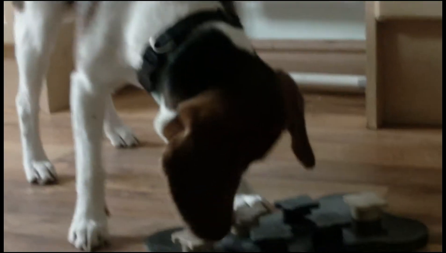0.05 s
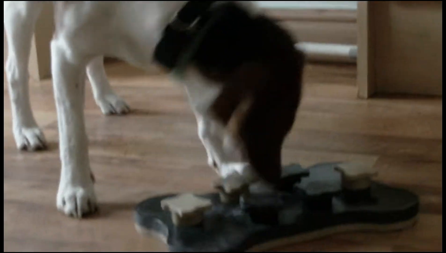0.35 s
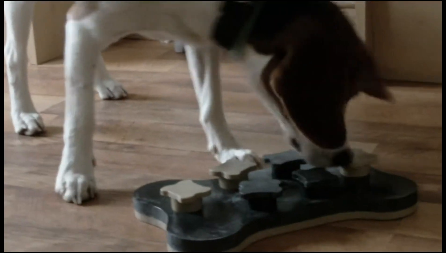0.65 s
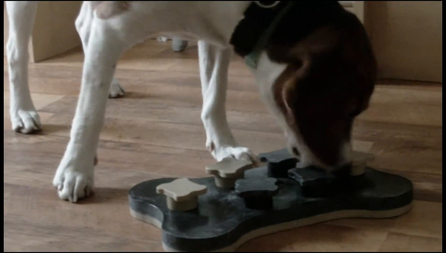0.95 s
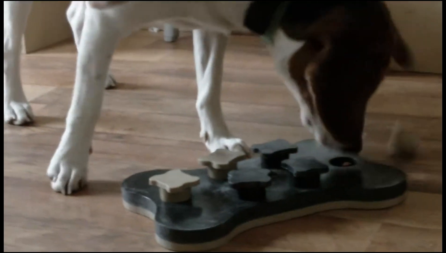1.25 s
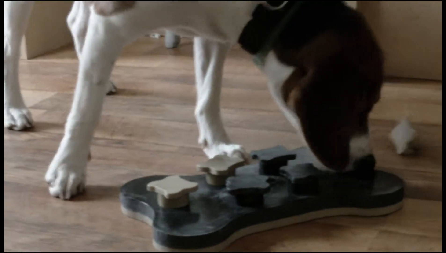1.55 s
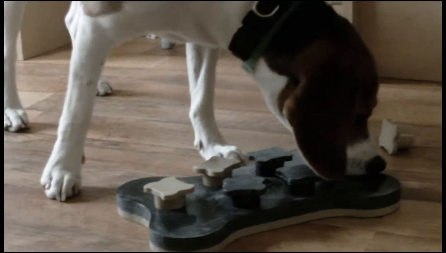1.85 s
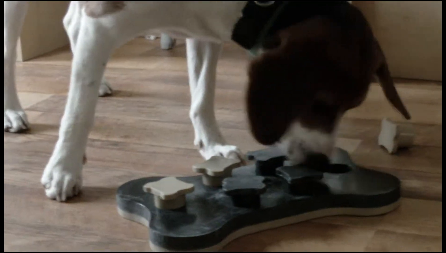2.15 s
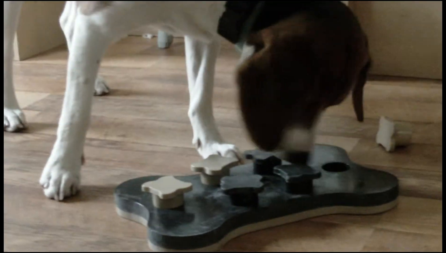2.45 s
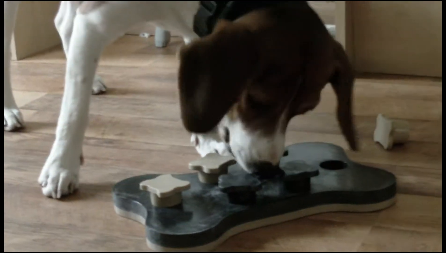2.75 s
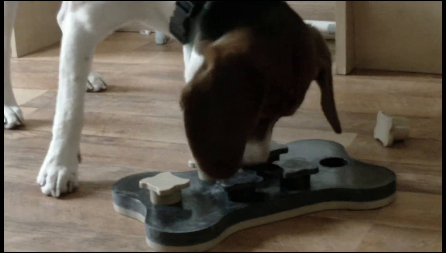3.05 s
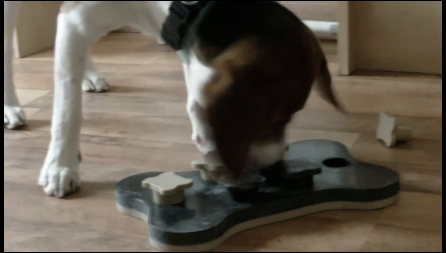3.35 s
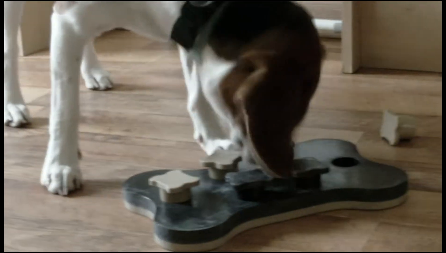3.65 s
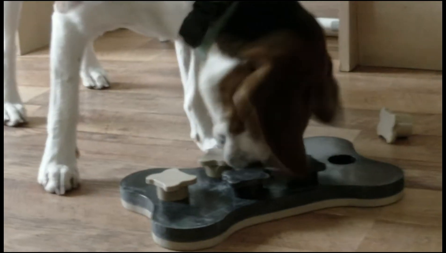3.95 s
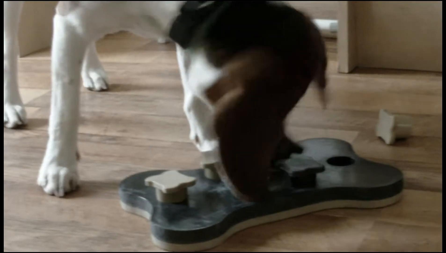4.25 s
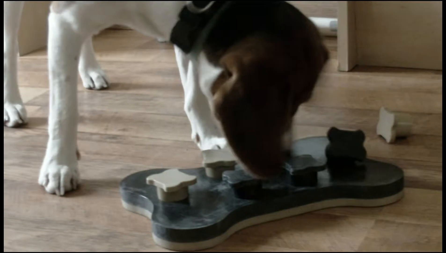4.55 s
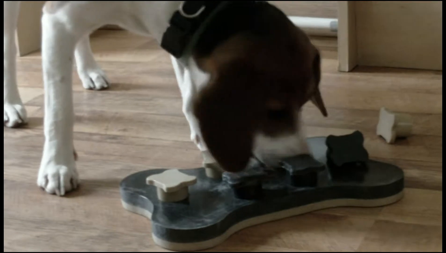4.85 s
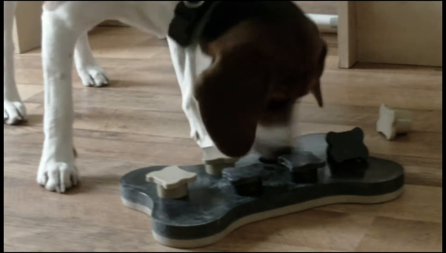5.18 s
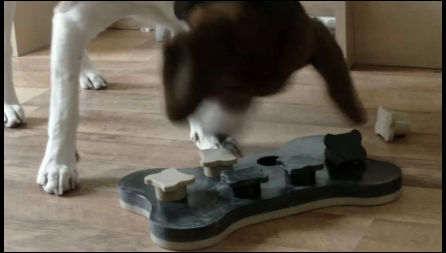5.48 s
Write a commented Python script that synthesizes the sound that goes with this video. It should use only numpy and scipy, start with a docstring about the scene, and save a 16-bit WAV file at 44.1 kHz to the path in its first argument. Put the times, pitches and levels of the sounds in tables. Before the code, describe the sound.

In a reverberant room with a faint hum, plastic covers tick and scrape softly as a dog pushes at a puzzle board. One piece tumbles onto the hard floor with several loud, quickly bouncing clacks. After a quieter stretch of small taps, slides and brief sniffs, a second piece rattles over the hollow board and settles, with a light collar jingle. The sound reaches the microphone louder on the right.

```python
"""Soft bumps and light clicks come first: a dog noses the plastic covers of a treat puzzle on laminate.
One cover tumbles onto the floor in ever shorter bounces; later another clatters across the hollow
board and rocks to rest. Each impact is a brief force filtered by the resonances of the struck body.
Between them come stick-slip scrapes and squeaks, sniffs and the tinkle of a collar ring,
in a bare, reverberant room with a faint machine hum."""
import sys
import numpy as np
from scipy import signal
from scipy.fft import rfft, irfft
from scipy.io import wavfile
from scipy.ndimage import uniform_filter1d

SR = 44100
rng = np.random.default_rng(int(sys.argv[2]) if len(sys.argv) > 2 else 0)


def unload_audio(sound):
    """Save the sound as a 16-bit wav file, at the path given as the first command line argument."""
    columns = np.transpose(np.atleast_2d(sound))
    # keep every value between -1 and 1, then stretch to whole-number steps
    steps = np.round(np.clip(columns, -1, 1) * 32767)
    wavfile.write(sys.argv[1], SR, steps.astype(np.int16))


N = 252252


# spectrum of a cover striking the laminate: (frequency [Hz], level [dB])
FLOOR_SPECTRUM = [(60, -58), (150, -22), (290, -14.5), (390, -4), (560, -1), (800, -7), (1100, -13.5),
                  (1400, -17), (1800, -23.5), (3100, -18), (4500, -31.5), (7000, -33), (10000, -42),
                  (16000, -58)]
# modes of the floorboards: (frequency [Hz], level [dB], 60 dB decay time [s])
FLOORBOARD_MODES = [(388, -3, .38), (440, -2, .42), (525, 0, .5), (573, -4, .45), (667, -4, .42),
                    (728, -9, .42), (804, -9, .4), (908, -13, .4), (1000, -15, .4), (1089, -16, .4),
                    (1299, -14, .35), (1410, -16, .35)]
def floor_knocks(gain_db=13, ring_db=-37, plastic_share=0.42):
    """Impact excitation: each blow gives a deep clack, then the floor's modes decay exponentially."""
    hits = landings() + rebounds() + bumps()
    body_db = read(FLOOR_SPECTRUM, bins()) + plastic_share * plastic_resonances()
    tracks = amp(gain_db) * impacts(hits, body_db, chatter_s=0.003, snap=0.41)
    t = np.arange(SR) / SR
    modes = sum(amp(db - 60 * t / t60) * np.sin(2 * np.pi * hz * t) for hz, db, t60 in FLOORBOARD_MODES)
    ringing = np.zeros(N)
    for s, db, *_ in hits:
        add(ringing, s, amp(db + gain_db + ring_db) * modes)
    return room(tracks, wet_db=-0.5, aim_db=np.transpose(hits)[2]) + ringing


# a loose cover falls on the floor: (time [s], relative level [dB], edge [dB],
# favoured ring [Hz], first flight [s], loss per bounce [dB])
COVER_DROPS = [(1.1878, -2, 0, 3270, .036, 0.5), (1.319, -9, -4, 560, 0.01, 11),
               (1.6428, -6.5, -0.5, 620, .024, 11)]
def landings(aim_db=3, thud_db=1, lift_db=4):
    """Momentum transfer: a falling cover first strikes the floor squarely."""
    return [(s, db, aim_db, thud_db, edge_db, hz, lift_db) for s, db, edge_db, hz, *_ in COVER_DROPS]


def rebounds(restitution=0.68, rebound_db=-5, aim_db=1, thud_db=-1, dull_db=-2, ring_hz=540, lift_db=4):
    """Inelastic collision: each bounce is shorter, weaker and duller than the last."""
    hits = []
    for s, db, edge_db, _, flight_s, loss_db in COVER_DROPS:
        for k in range(4):
            onset = s + flight_s * np.sum(restitution ** np.arange(k + 1))
            level = db + rebound_db - k * loss_db
            hits.append((onset, level, aim_db, thud_db, edge_db + (k + 1) * dull_db, ring_hz, lift_db))
    return hits


def board_knocks(gain_db=13):
    """Resonant filtering: the hollow board colours each blow of a cover into a plastic click."""
    hits = nudges() + fall_backs() + rocking()
    tracks = amp(gain_db) * impacts(hits, board_body(), chatter_s=0.0036, snap=0.15)
    return room(tracks, wet_db=-1, aim_db=np.transpose(hits)[2])


# broad spectrum of a cover striking the board: (frequency [Hz], level [dB])
BOARD_SPECTRUM = [(60, -30), (200, -1.5), (330, -5), (500, 0), (900, -5), (1100, -8.5), (1700, -15),
                  (2700, -5.5), (3500, -9.5), (4100, -27), (6500, -33.5), (8500, -36.5), (11000, -47),
                  (16000, -47)]
def board_body():
    """Frequency response of the board in dB: resonance peaks on a broad slope."""
    return read(BOARD_SPECTRUM, bins()) + plastic_resonances()


# resonances of the hollow plastic: (frequency [Hz], width [Hz], lift [dB])
PLASTIC_MODES = [(418, 98, 12.3), (1295, 125, 9.2), (1381, 203, 12.8), (1630, 30, 7.2), (2335, 100, 7.9),
                 (2920, 210, 2.8), (3340, 100, 5.2), (3866, 120, 1.6), (4500, 120, 2.7), (5400, 80, 8),
                 (7900, 350, 3)]
def plastic_resonances():
    """Normal modes: each lifts the spectrum, in dB, around its own frequency."""
    return sum(db * peak(hz, width) for hz, width, db in PLASTIC_MODES)


# the nose pushes a cover: (time [s], relative level [dB], thud [dB], edge [dB], favoured ring [Hz])
NOSE_KNOCKS = [(0.1854, -35.5, 9, 16, 2940), (0.2561, -31.5, 13, 15.5, 2350), (0.7253, -26.5, 5, 3, 467),
               (1.097, -29.5, 1.5, -6, 740), (1.140, -24.5, -5, -12, 1550), (1.928, -33, -1, -19, 1150),
               (2.61, -31, 6, -8, 3400), (3.0977, -34, -1, 10.5, 2430), (3.6235, -28, 8.5, 16, 3370),
               (3.739, -19, -3, 13, 3120), (4.1472, -30, -22, -9.5, 1260), (4.1807, -13, 1.5, 8, 3630),
               (4.3149, -11.5, -1, 7, 2280), (4.398, -12, -7.5, 2, 3460), (4.4660, -10.5, -6, 0, 3420),
               (4.5316, -19.5, 1.5, -19, 1820)]
def nudges(aim_db=3, lift_db=8):
    """Collision: the pushed covers strike the board, each spot favouring one ring."""
    return [(s, db, aim_db, thud_db, edge_db, hz, lift_db) for s, db, thud_db, edge_db, hz in NOSE_KNOCKS]


def fall_backs(above_db=-16, flight_s=0.037, softer_db=-5,
               aim_db=-2, thud_db=3, edge_db=-5, ring_hz=2300, lift_db=6):
    """Free fall: a cover lifted by a hard knock drops flat into its slot again."""
    return [(s + flight_s, db + softer_db, aim_db, thud_db, edge_db, ring_hz, lift_db)
            for s, db, *_ in NOSE_KNOCKS if db > above_db]


def rocking(start_s=4.5945, step_s=0.0313, db=-21.5, fade_db_per_s=-10, lift_db=7):
    """Damped oscillation: the last cover taps evenly, thin on its rim and full on its flat side."""
    # (aim [dB], thud [dB], edge [dB], favoured ring [Hz])
    rim, flat = (5, -10, -8, 3500), (0, 1, -20, 1400)
    return [(start_s + k * step_s, db + fade_db_per_s * k * step_s, *side, lift_db)
            for k, side in enumerate([rim, flat] * 3)]


# the dog shifts about on the floor: (time [s], relative level [dB])
DOG_BUMPS = [(0.095, -31.5), (0.23, -34.5), (1.901, -33), (2.027, -38)]
def bumps(aim_db=6, thud_db=7, edge_db=-7, ring_hz=255, lift_db=14):
    """Cushioned impact: a padded blow puts its energy into low frequencies."""
    return [(s, db, aim_db, thud_db, edge_db, ring_hz, lift_db) for s, db in DOG_BUMPS]


# covers slide in their slots: (time [s], length [s], level [dB], thud [dB], edge [dB])
COVER_SLIDES = [(0.702, 0.11, -48, 11, -4), (1.044, 0.1, -43.5, 3.5, -19), (2.592, 0.061, -46.5, -3, -33),
                (3.028, 0.16, -51.5, 11.5, -7), (3.358, 0.1157, -42.5, 11, 11),
                (4.135, 0.053, -36.5, 6, -16), (4.539, 0.284, -44, -6, -22)]
def scrapes(slips_per_s=1400, spread_db=2.5):
    """Stick-slip friction: many tiny, irregular jerks ring the board."""
    out = np.zeros(N)
    for s, length, db, thud_db, edge_db in COVER_SLIDES:
        n = round(length * SR)
        strength = rng.standard_normal(N) * amp(spread_db * rng.standard_normal(N))
        slipping = rng.random(N) < slips_per_s / SR
        force = unit_rms((strength * slipping)[:n]) * signal.windows.tukey(n, 0.7)
        board = ring(board_body() + touch(thud_db, edge_db))
        add(out, s, amp(db) * signal.fftconvolve(force, board))
    return room(out[None], wet_db=-3)


# short rubbing squeaks: (time [s], length [s], pitch [Hz], level [dB])
RUB_SQUEAKS = [(4.036, 0.0426, 518, -41), (5.134, 0.0394, 913, -53.5)]
def squeaks(waver=0.054):
    """Periodic stick-slip: the slips fall nearly into step and make a soft, wavering tone."""
    out = np.zeros(N)
    for s, length, hz, db in RUB_SQUEAKS:
        n = round(length * SR)
        drift = unit_rms(uniform_filter1d(rng.standard_normal(N), size=200))[:n]
        pitch = hz * (1 + waver * drift)
        tone = np.sin(2 * np.pi * np.cumsum(pitch) / SR)
        add(out, s, amp(db) * unit_rms(tone * signal.windows.cosine(n)))
    return room(out[None], wet_db=-26)


# the collar's metal ring is shaken: (time [s], length [s], pitch [Hz], relative level [dB])
COLLAR_SHAKES = [(1.074, .08, 7700, -48), (3.740, .02, 8000, -43), (4.179, .17, 7970, -44),
                 (4.465, .02, 8170, -34), (4.60, .08, 7750, -46)]
def tinkles(gain_db=12, step_s=0.062, width_hz=900, lift_db=36):
    """Damped resonance: each contact of the shaken ring excites one high, short-lived mode."""
    out = np.zeros(N)
    for s, length, hz, db in COLLAR_SHAKES:
        ping = ring(lift_db * peak(hz, width_hz))
        for delay in np.arange(0, length, step_s):
            force = contact(chatter_s=0.0062, snap=0.48)
            add(out, s + delay, amp(db + gain_db) * signal.fftconvolve(force, ping))
    return room(out[None], wet_db=0)


# sniffs and snorts: (time [s], length [s], nostril whistle [Hz], level [dB])
DOG_SNIFFS = [(1.572, 0.064, 9300, -51.5), (1.902, 0.18, 3030, -55.5), (3.381, 0.0954, 8300, -51),
              (3.614, 0.037, 7600, -44.5)]
# spectrum of air through the nose: (frequency [Hz], level [dB])
NOSE_SPECTRUM = [(150, -24), (430, -4), (650, -12), (870, 2), (1100, -15), (1350, -23), (1800, -37),
                 (2400, -14), (3000, -10.5), (4000, -17), (7000, -23), (9500, -23.5), (15000, -38)]
def sniffs(whistle_db=10, whistle_width_hz=600):
    """Source and filter: the nose shapes puffs of airflow noise and adds a thin whistle."""
    out = np.zeros(N)
    for s, length, hz, db in DOG_SNIFFS:
        n = round(length * SR)
        puff = rng.standard_normal(N)[:n] * signal.windows.tukey(n, 0.7)
        nose = ring(read(NOSE_SPECTRUM, bins()) + whistle_db * peak(hz, whistle_width_hz))
        add(out, s, amp(db) * signal.fftconvolve(puff, nose))
    return room(out[None], wet_db=-4)


def impacts(hits, body_db, chatter_s, snap):
    """Convolution of contact force and body response gives one track for each hit:
    (time [s], level [dB], aim at the listener [dB], thud [dB], edge [dB], ring [Hz], its lift [dB])."""
    tracks = np.zeros((len(hits), N))
    for track, (s, db, _, *manner) in zip(tracks, hits):
        response = ring(body_db + touch(*manner))
        add(track, s, amp(db) * signal.fftconvolve(contact(chatter_s, snap), response))
    return tracks


def contact(chatter_s, snap, flatten=0.85, size=4096):
    """Broadband excitation: a snap and milliseconds of chatter, with a nearly flat spectrum."""
    t = np.arange(size) / SR
    burst = rng.standard_normal(size) * t / chatter_s * np.exp(-(t / chatter_s) ** 2)
    burst /= np.linalg.norm(burst)
    burst[0] += snap
    burst_db = 20 * np.log10(abs(rfft(burst)) + 0.05)
    force = signal.fftconvolve(burst, ring(-flatten * burst_db))[:size]
    return force / np.linalg.norm(force)


def touch(thud_db, edge_db, ring_hz=1000, lift_db=0, thud_hz=800, edge_hz=3800, width_share=0.095):
    """Contact geometry: a flat face adds bass (thud), a corner treble (edge), the struck spot a ring."""
    thud = thud_db / (1 + (bins() / thud_hz) ** 4)
    edge = edge_db * (1 - 1 / (1 + (bins() / edge_hz) ** 2))
    return thud + edge + lift_db * peak(ring_hz, width_share * ring_hz)


# the room's first reflections: (delay [s], level [dB])
EARLY_ECHOES = [(.0028, -19), (0.0102, -13.5), (0.0249, -18.5), (.037, -13)]
def room(tracks, wet_db, aim_db=0, paths=5):
    """Superposition: direct sound, weighted by aim, plus echoes and tails that vary from hit to hit."""
    out = (tracks.T * amp(aim_db)).sum(axis=1)
    for k in range(min(paths, len(tracks))):
        path = amp(wet_db) * room_tail()
        for s, db in EARLY_ECHOES:
            path[round(s * SR)] += amp(db)
        out += signal.oaconvolve(tracks[k::paths].sum(0), path)[:N]
    return out


# reverberation time: (frequency [Hz], 60 dB decay time [s])
ROOM_DECAY = [(150, 0.31), (500, 0.43), (1400, 0.4374), (3000, 0.49), (8000, 0.44), (15000, 0.04)]
# how strongly the room returns each pitch: (frequency [Hz], level [dB])
ROOM_SPECTRUM = [(150, 0.5), (300, -2.5), (480, 4), (900, 4), (1400, -3), (1800, 5.5), (2400, 0.5),
                 (3000, -1.5), (3550, -3.5), (4200, 6.5), (5500, -1), (8000, -0.5), (12000, -7.5)]
def room_tail(build_s=0.0033, density=0.15, size=32768):
    """Diffuse reverberation: dense reflections build up quickly; each band dies at its own rate."""
    taps = rng.standard_normal(size) * (rng.random(size) < density)
    hz, t, bands = signal.stft(taps, SR, nperseg=256)
    t60 = read(ROOM_DECAY, hz)[:, None]
    bands *= amp(read(ROOM_SPECTRUM, hz)[:, None] - 60 * t / t60)
    tail = signal.istft(bands, SR, nperseg=256)[1]
    tail *= 1 - np.exp(-(np.arange(len(tail)) / SR / build_s) ** 2)
    return tail / np.linalg.norm(tail)


# loudness of a faint machine: (time [s], level [dB])
DRONE_LEVEL = [(0, -47.5), (2.4, -48), (2.9, -56.5), (4.6, -52), (5.72, -66)]
# spectrum of its rush: (frequency [Hz], level [dB])
RUSH_SPECTRUM = [(25, -22), (60, 0), (100, 0), (150, -6.5), (220, -3.5), (320, -6), (480, -7), (780, -7.5),
                 (1100, -17), (2200, -23.5), (3100, -19), (4000, -34), (12000, -38)]
# its hum: (frequency [Hz], level relative to the rush [dB])
HUM_TONES = [(100, -6), (399, -9)]
def machine_drone():
    """Tonal and broadband noise share one envelope, which dips halfway and fades at the end."""
    t = np.arange(N) / SR
    hum = sum(amp(db) * unit_rms(np.sin(2 * np.pi * (hz * t + rng.random()))) for hz, db in HUM_TONES)
    return envelope(DRONE_LEVEL) * (noise(RUSH_SPECTRUM) + hum)


# loudness of a deep rumble: (time [s], level [dB])
RUMBLE_LEVEL = [(0.0, -49), (0.08, -53), (1.78, -55), (1.85, -48.5), (4.86, -54), (5.38, -54), (5.72, -54)]
# its spectrum: (frequency [Hz], level [dB])
RUMBLE_SPECTRUM = [(12, -20), (28, -1.5), (46, -1), (62, -5.5), (80, -5.5), (130, -18), (400, -66)]
def rumble():
    """Amplitude modulation: low-frequency noise swells and sinks unevenly."""
    return envelope(RUMBLE_LEVEL) * noise(RUMBLE_SPECTRUM)


# spectrum of the room's air: (frequency [Hz], level [dB])
AIR_SPECTRUM = [(15, -22), (45, -9), (90, -5), (130, -8.5), (200, -7), (310, -12), (450, -13.5),
                (800, -16.5), (1300, -18.5), (3200, -25.5), (7000, -29.5), (15500, -33)]
def room_air(db=-51.5):
    """Stationary noise: a soft, steady rush, strongest in the bass."""
    return amp(db) * noise(AIR_SPECTRUM)


def amp(db):
    """Decibels to gain."""
    return 10 ** (np.asarray(db) / 20)


def unit_rms(x):
    """Normalisation to rms 1."""
    return x / np.sqrt(np.mean(x ** 2) + 1e-20)


def envelope(points):
    """Gain over time, interpolated in decibels."""
    return amp(np.interp(np.arange(N) / SR, *np.transpose(points)))


def read(points, hz):
    """Interpolation of a table on a log-frequency axis."""
    f, value = np.transpose(points)
    return np.interp(np.log(hz + 1), np.log(f + 1), value)


def add(mix, s, sound):
    """Superposition of a sound on the mix at time s."""
    part = mix[max(round(s * SR), 0):][:len(sound)]
    part += sound[:len(part)]


def bins(size=4096):
    """Frequencies of a discrete spectrum."""
    return np.fft.rfftfreq(size, 1 / SR)


def peak(centre_hz, width_hz):
    """Resonance curve of height 1."""
    return 1 / (1 + (2 * (bins() - centre_hz) / width_hz) ** 2)


def ring(db):
    """Minimum-phase impulse response, of energy 1, with this spectral shape."""
    log_gain = np.log(amp(np.concatenate([db, db[-2:0:-1]])))
    spectrum = np.exp(np.conj(signal.hilbert(log_gain)))
    response = np.fft.ifft(spectrum).real
    return response / np.linalg.norm(response)


def noise(points):
    """Spectral shaping of white noise, scaled to rms 1."""
    white = rfft(rng.standard_normal(N))
    return unit_rms(irfft(white * amp(read(points, bins(N))), N))


def scene(left_db=-4.5, right_db=4):
    """Level difference: one sound in both channels, louder on the right, each with its own faint hiss."""
    sound = floor_knocks() + board_knocks() + scrapes() + squeaks() + tinkles() + sniffs()
    sound += machine_drone() + rumble() + room_air()
    hiss = amp([[-62.5], [-58]]) * rng.standard_normal((2, N))
    return amp([[left_db], [right_db]]) * sound + hiss


def record(dry, cutoff_hz=15900):
    """Hard clipping of peaks beyond full scale, then a low-pass band limit."""
    clipped = np.clip(dry, -1, 1)
    lowpass = signal.firwin(511, cutoff_hz, window=("kaiser", 9), fs=SR)
    return signal.oaconvolve(clipped, lowpass[None], "same")


dry = scene()
out = record(dry)
unload_audio(out)
```